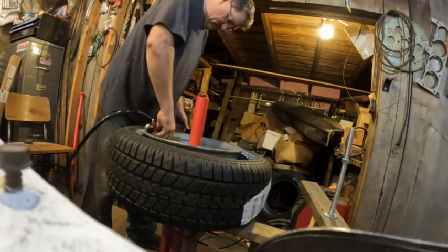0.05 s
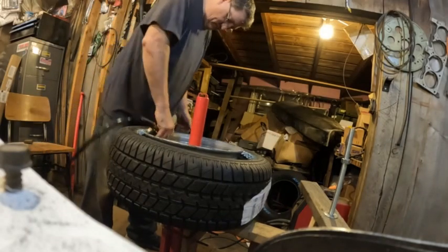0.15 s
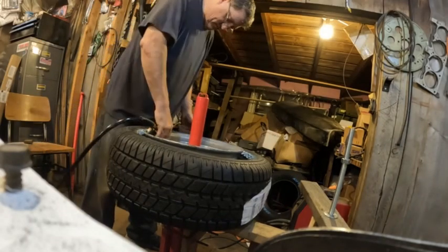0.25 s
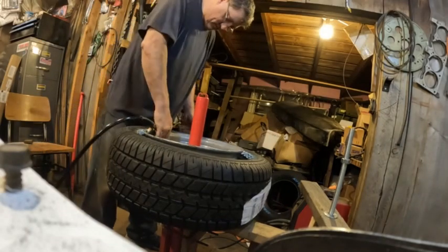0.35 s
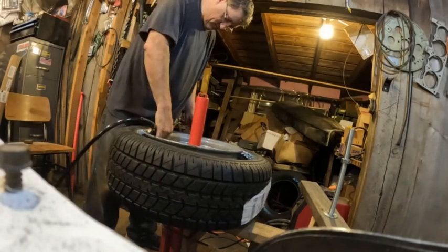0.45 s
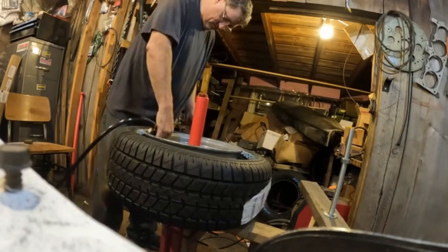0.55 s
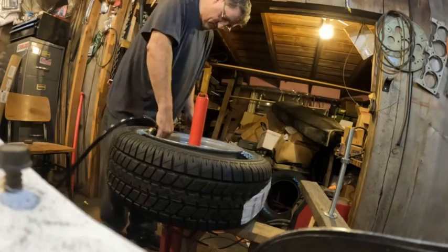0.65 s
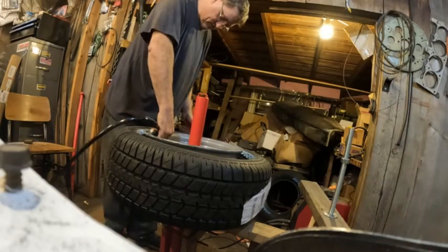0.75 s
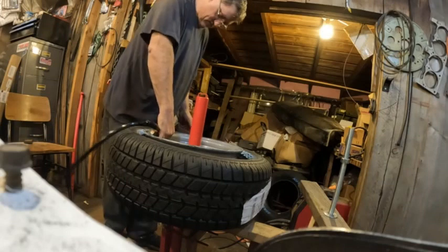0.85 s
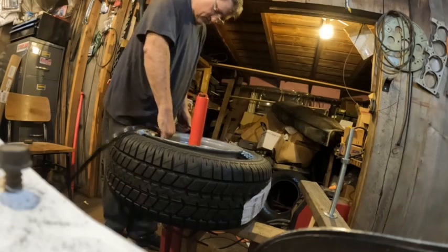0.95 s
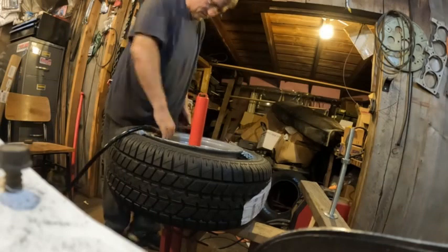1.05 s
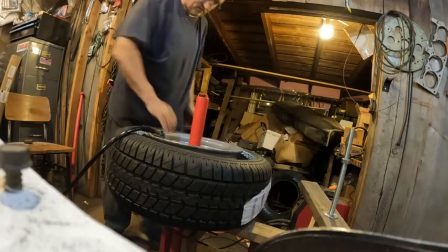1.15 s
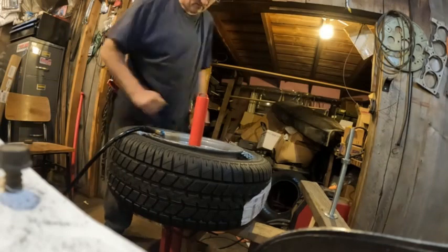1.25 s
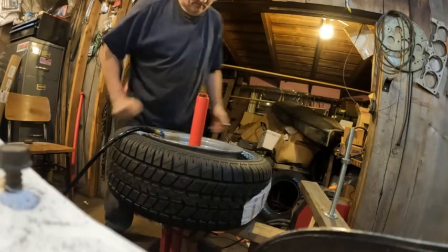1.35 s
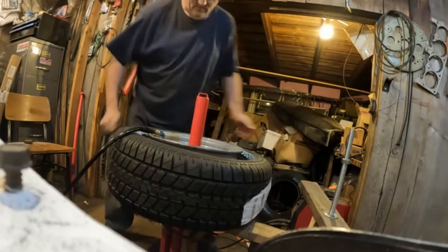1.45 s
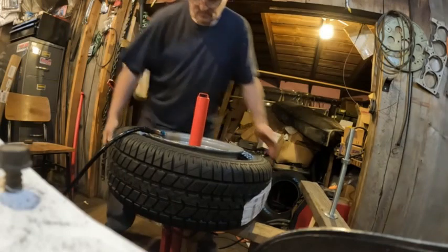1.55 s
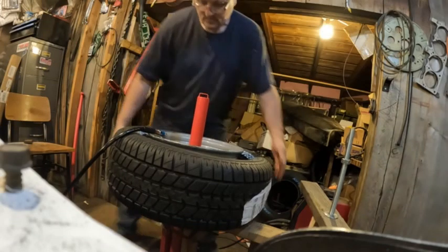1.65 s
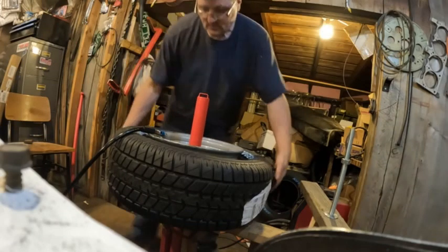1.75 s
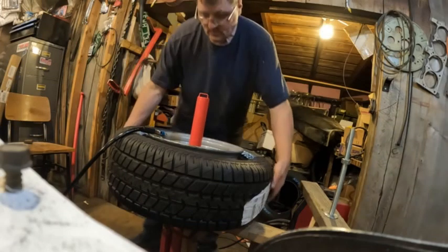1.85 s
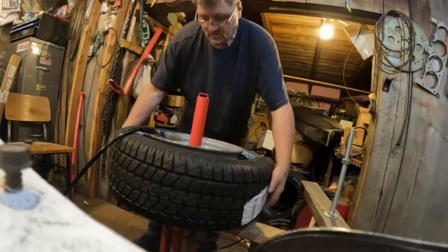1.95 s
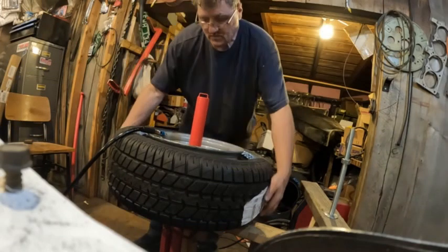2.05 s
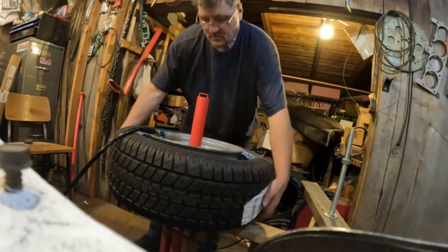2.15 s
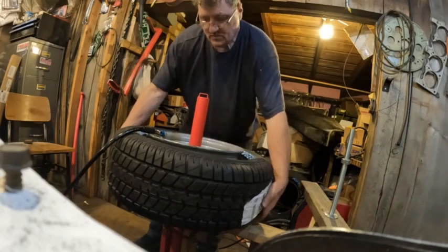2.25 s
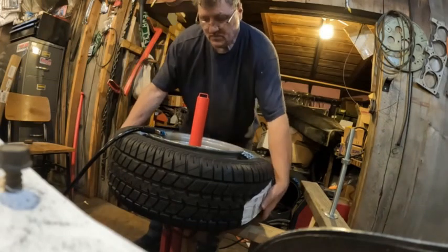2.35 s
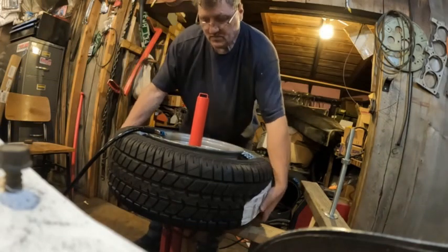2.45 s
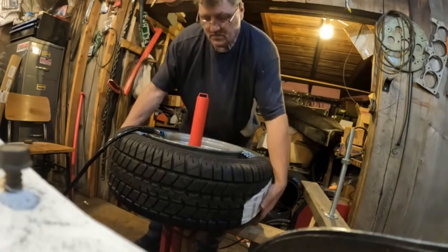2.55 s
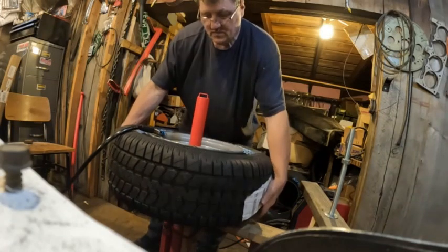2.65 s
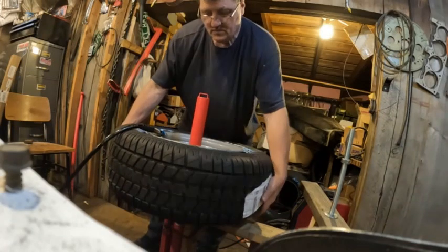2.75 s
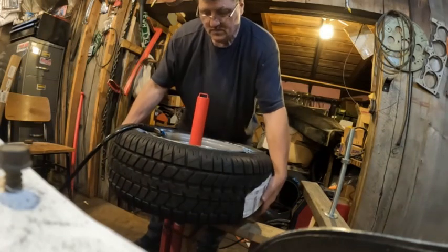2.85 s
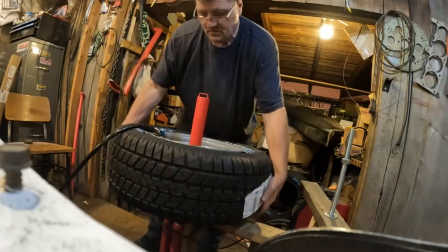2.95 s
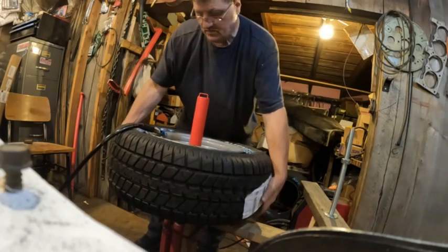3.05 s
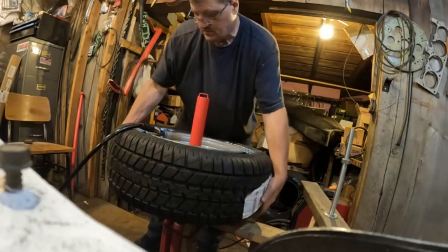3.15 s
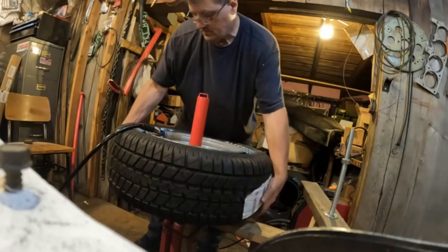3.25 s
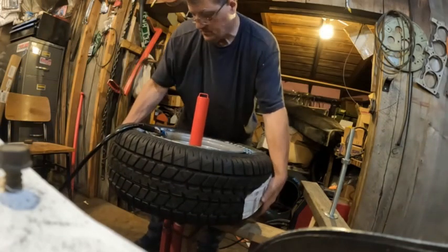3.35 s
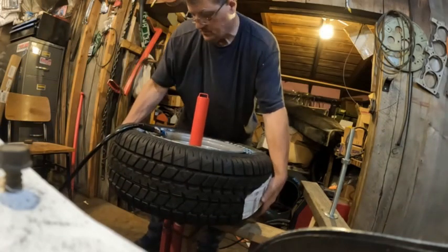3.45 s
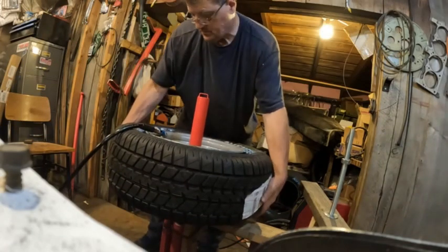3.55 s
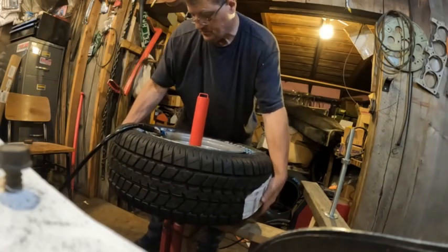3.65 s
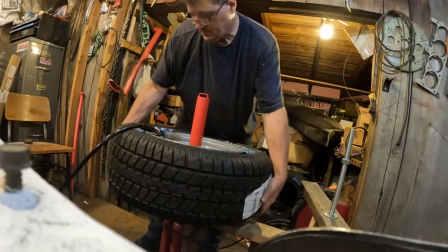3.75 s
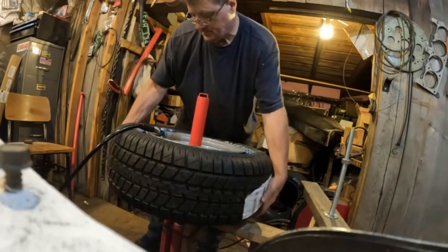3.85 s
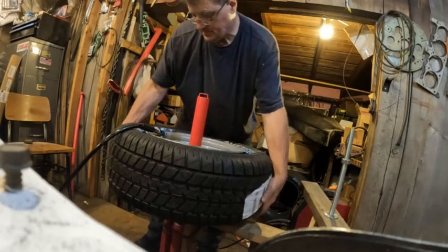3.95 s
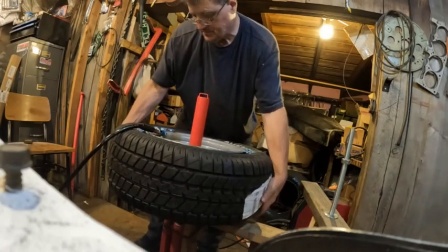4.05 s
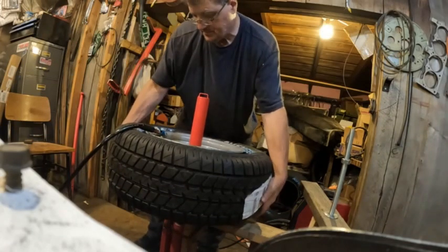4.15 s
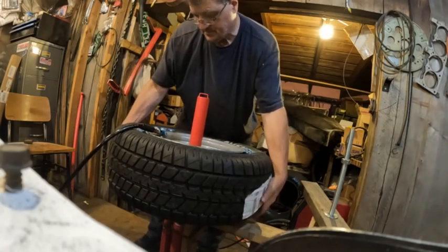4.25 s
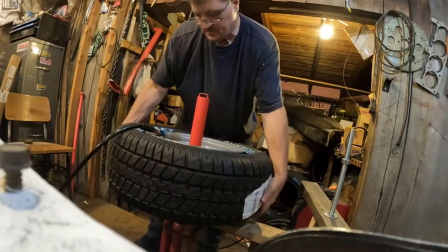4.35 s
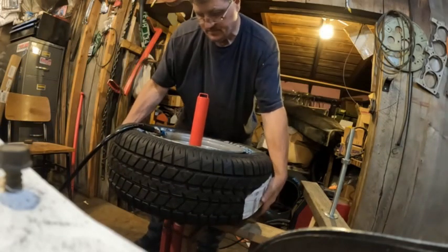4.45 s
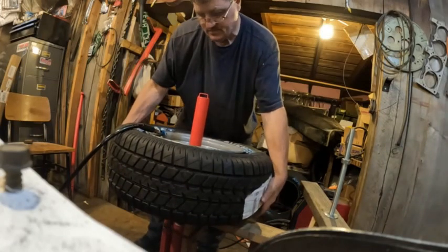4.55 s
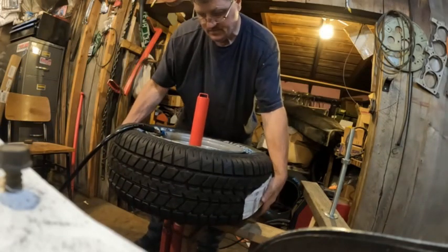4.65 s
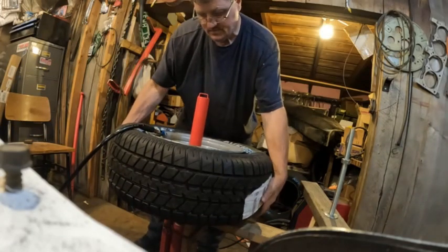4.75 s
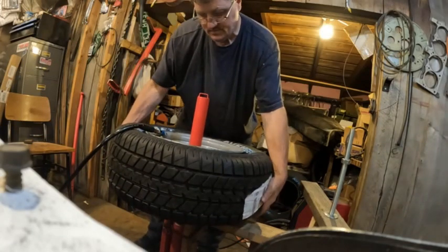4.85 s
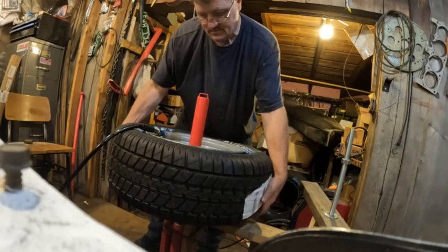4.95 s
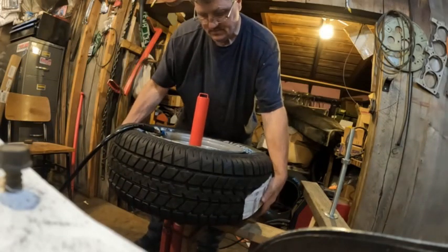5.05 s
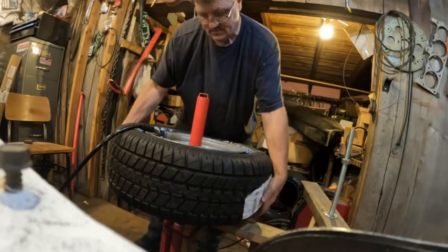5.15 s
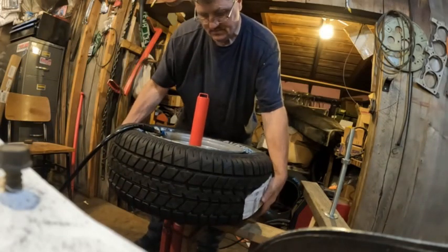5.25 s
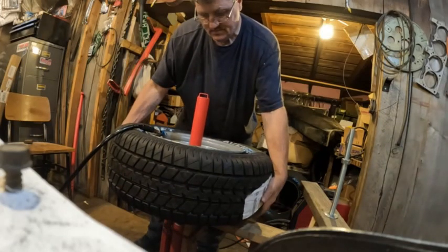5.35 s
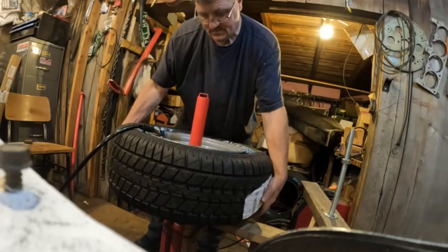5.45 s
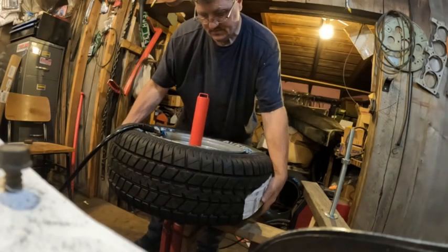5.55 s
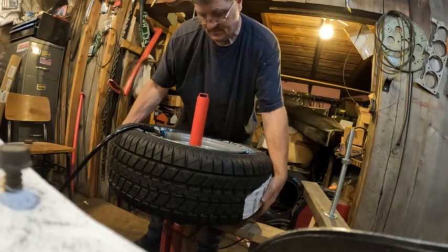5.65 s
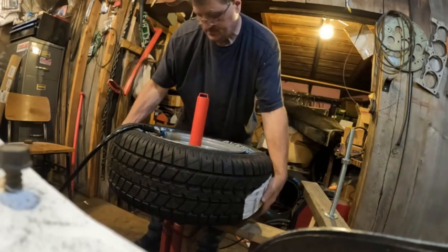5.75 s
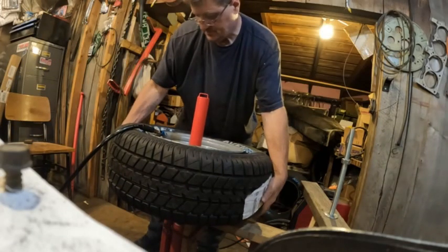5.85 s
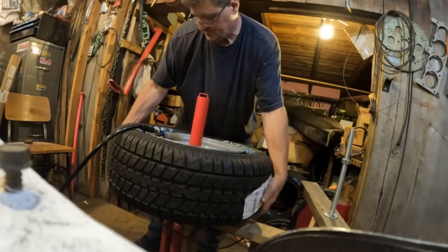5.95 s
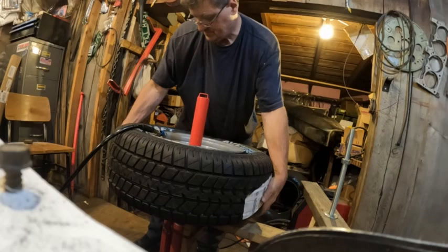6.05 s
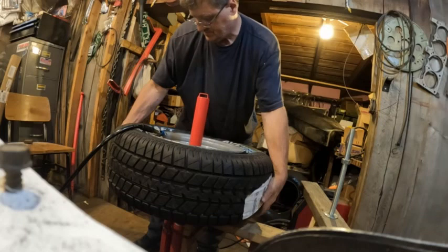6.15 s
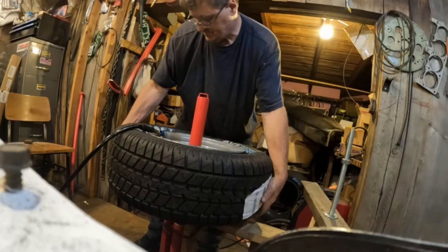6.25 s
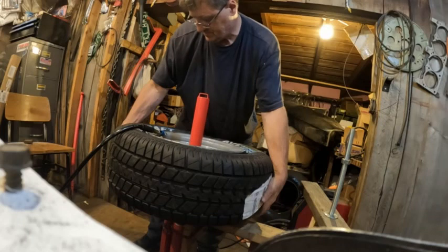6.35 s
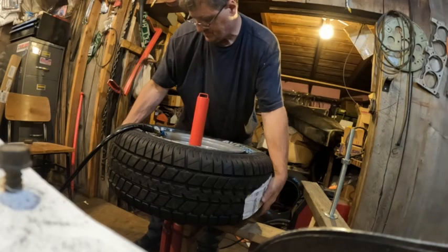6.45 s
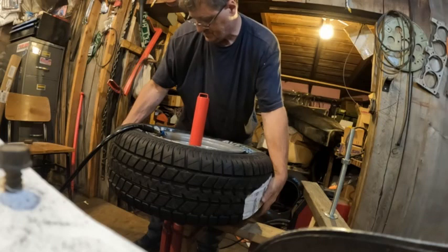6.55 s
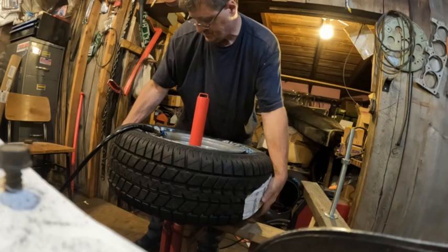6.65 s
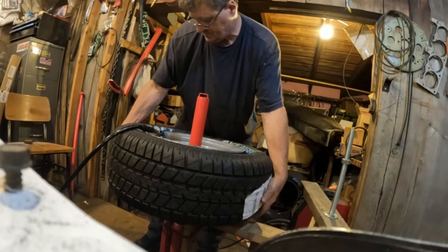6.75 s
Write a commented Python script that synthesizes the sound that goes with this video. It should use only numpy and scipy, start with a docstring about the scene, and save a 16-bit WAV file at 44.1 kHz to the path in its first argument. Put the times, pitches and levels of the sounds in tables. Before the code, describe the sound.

A loud, bright rush of escaping air fills the first three seconds, broken by a cluster of dull rubber thuds as the tyre is gripped and lifted. It cuts off quickly with a double low pop; a narrow high hiss rises and fades. The remaining air sings and hisses inside the closed tyre, swelling slightly after three and a half seconds, with tiny rubber knocks and rustles. Close microphones in a small garage.

```python
"""Inflating a tyre in a garage

A tyre is inflated on its wheel in a small wooden garage: air (filtered noise) roars out past the loose bead,
the edge of the tyre. The tyre is pulled up and the bead flops shut with a dull pop (fading sine thuds and noise).
A thin climbing hiss (narrow noise, shifted up in pitch) is squeezed off, and the jet goes on inside,
where noise filtered by the tyre's resonances rings, while the rubber creeps, knocks and rustles."""
import sys
import numpy as np
from scipy import signal
from scipy.fft import rfft, irfft
from scipy.io import wavfile
from scipy.ndimage import uniform_filter1d, map_coordinates

SR = 44100
rng = np.random.default_rng(int(sys.argv[2]) if len(sys.argv) > 2 else 0)


def unload_audio(sound):
    """Save the sound as a 16-bit wav file, at the path given as the first command line argument."""
    columns = np.transpose(np.atleast_2d(sound))
    # keep every value between -1 and 1, then stretch to whole-number steps
    steps = np.round(np.clip(columns, -1, 1) * 32767)
    wavfile.write(sys.argv[1], SR, steps.astype(np.int16))


N = 299880
T = np.arange(N) / SR
HZ = np.maximum(np.fft.rfftfreq(N, 1 / SR), 1)  # every frequency of the spectrum, kept above zero
# the tyre is gripped and pulled up, its bead starts to close, then seats on the rim
LIFT_S, CLOSING_S, SEATED_S = 0.9, 2.786, 2.92


# turbulence of the escaping air: (frequency [Hz], relative level [dB])
LEAK_COLOUR = [(25, -32), (180, -26), (500, -26), (850, -25.5), (1300, -14), (2600, -7.5), (4500, -2),
               (6100, 0), (7600, -6.5), (8200, -9), (9200, -10.5), (10200, -7.5), (11300, -13),
               (13400, -17)]
# resonances of the open gap and rim well: (frequency [Hz], width [Hz], relative level [dB])
GAP_MODES = [(241,19,-13), (1333,25,-12), (1601,22,-10), (1776,19,-8), (1943,64,-6), (2132,46,-5),
             (2485,80,-5), (2700,28,-2.5), (2794,92,-3), (2996,80,-2.5), (3117,17,1), (3407,65,6.5),
             (3578,62,6.5), (3823,19,0), (4181,69,-3), (4770,22,1), (4889,19,1), (5444,55,2), (5666,101,4),
             (5936,27,2.5), (6041,28,1.5), (7210,60,-1), (7660,169,0), (10512,28,-4.5)]


def open_bead():
    """Air roars past the open bead, brightens as the gap narrows and is cut off as it closes."""
    droop_db_per_s, cut_db_per_s = 0.23, 113
    level_db = -18 - droop_db_per_s * T - cut_db_per_s * since(CLOSING_S)
    tilt = -0.13 + 0.5 * T  # dB per octave
    gain = resonant(LEAK_COLOUR, GAP_MODES)
    roar = jet(gain, level_db, tilt, side_db=-13, flutter_db=0.68, flutter_rate=20)
    lower = shape(roar, colour([(500, -28), (1000, -6), (2000, 2.5), (3300, -25)]))
    # the lower part is fuller while the gap is wide; a passing hand briefly thins it
    pass_s, pass_length_s, shift_s = 1.146, 0.052, 0.06
    before_pass = 1 / (1 + np.exp(np.minimum((T - pass_s) / shift_s, 20)))
    fullness = 0.21 * before_pass - 0.61 * bump(pass_s, pass_length_s)
    return roar + fullness * lower


# turbulence of the jet heard through the tyre wall: (frequency [Hz], relative level [dB])
FILL_COLOUR = [(110, -34.5), (170, -23.5), (400, -46), (750, -42), (1200, -18), (2100, -22), (2600, -6),
               (3400, -5.5), (5400, -4.5), (7600, -9.5), (8400, -17), (10400, -17.5), (11500, -21.5),
               (13400, -24)]
# air resonances of the closed tyre: (frequency [Hz], width [Hz], relative level [dB])
CAVITY_MODES = [(437,19,-21), (646,10,-18.5), (856,8.2,-13), (912,6.7,-5), (982,12,-8.5), (1066,8,-3),
                (1236,6.2,-2.5), (1287,6.7,6.5), (1357,4.6,4), (1475,4.5,6.5), (1627,19,-1), (1780,5,5),
                (1824,8.5,0), (1874,7.1,8), (1967,10,0), (2048,8,1), (2177,10.5,5), (2340,25,4.5),
                (2474,6.8,9.5), (2660,5.2,7.5), (2720,7,1), (2780,12,3.5), (2874,10,3.5), (2950,11,6.5),
                (3033,12,9), (3400,22,2), (3565,21,3.5), (3675,5.6,10.5), (3860,9,4)]
# high resonances of valve and rim: (frequency [Hz], width [Hz], relative level [dB])
RIM_MODES = [(4690,50,-0.5), (4850,24,4.5), (5155,37,5.5), (5385,25,3.5), (5820,23,6.5), (6310,28,5),
             (6812,20,-3), (7200,40,-2), (8027,17,-5), (8730,45,-5), (9600,42,-7), (10250,24,-8),
             (12077,18,-14)]


def filling():
    """The jet rings the closed tyre like a hollow drum, louder, duller and slightly lower as it swells."""
    swell_s, rise_s = 3.55, 0.29  # the rubber starts to stretch, and how fast the jet then comes up
    slack_db, taut_db, growth_db_per_s = -39, -34.5, 0.5
    age = since(swell_s)
    level_db = taut_db + (slack_db - taut_db) * np.exp(-age / rise_s) + growth_db_per_s * age
    tilt = 1.5 - 0.26 * age  # dB per octave
    gain = resonant(FILL_COLOUR, CAVITY_MODES + RIM_MODES)
    air = jet(gain, level_db, tilt, side_db=-10, flutter_db=0.6, flutter_rate=10)
    # playing the sound ever more slowly makes its pitch sink
    sag_share_per_s = 0.0014
    speed = 1 + sag_share_per_s * (age[-1] / 2 - age)
    position = np.cumsum(speed)
    return np.array([map_coordinates(ear, [position], order=5, mode="mirror") for ear in air])


# broad hiss around the slit's note: (frequency [Hz], relative level [dB])
SLIT_COLOUR = [(800, -41), (1900, -7.5), (3500, -14), (4800, -3), (5750, 4.5), (6700, -4), (7700, -0.5),
               (10000, -3), (11500, -8), (13400, -10.5)]


def closing_slit():
    """A narrow, unsteady hiss of three strands climbs and dies as the bead presses home."""
    attack_s, shut_s = 0.052, 3.87
    fade_db_per_s, shut_db_per_s = 21.5, 45  # the second fade adds to the first
    start_hz, top_hz, climb_s, waver_hz = 8150, 10150, 0.42, 80
    width_hz, spacing_hz, strand = 420, 620, 0.45  # strand: filter gain of the two outer strands
    age = since(CLOSING_S)
    level_db = -34 - fade_db_per_s * since(SEATED_S) - shut_db_per_s * since(shut_s)

    def peak(hz):
        return 1 / (1 + (2 * (HZ - hz) / width_hz) ** 2)

    band = shape(noise(side_db=-12), peak(0) + strand * peak(spacing_hz))
    # the slit's resonances rise as it narrows, and the soft rubber makes them waver
    centre_hz = top_hz + (start_hz - top_hz) * np.exp(-age / climb_s)
    phase = 2 * np.pi * np.cumsum(centre_hz + waver_hz * walk(25)) / SR
    note = unit(band * np.cos(phase))  # moves the band up to the centre, mirrored on both sides
    hiss = unit(shape(noise(side_db=-12), colour(SLIT_COLOUR)))
    swell = np.minimum(age / attack_s, 1)
    return (undb(-1) * note + undb(3.5) * hiss) * undb(level_db) * swell


# rubber knocking and slipping on the rim; each knock starts one attack time early:
# (time [s], push level [dB], pitch [Hz], slap relative to push [dB], time for the ring to fall 60 dB [s])
KNOCKS = [(0.06, -40, 121, -4, 0.12), (1.249, -36.5, 241, -10, 0.2), (1.621, -29.5, 159, -12, 0.1),
          (1.654, -27, 120, -21, 0.09), (1.689, -33, 45, -13, 0.2), (1.879, -33.5, 171, -3, 0.077),
          (1.943, -37.5, 100, -2, 0.1), (2.139, -36, 239, -6, 0.15), (2.835, -35.5, 49.7, -7, 0.16),
          (2.888, -33, 45.3, -1, 0.18), (2.903, -31.5, 122, -6.5, 0.18), (3.834, -46, 266, -7, 0.13),
          (3.876, -37, 252.2, -19, 0.078), (3.887, -42, 136, -19, 0.089), (5.049, -55, 170, 0, 0.13),
          (5.119, -46, 267, -16, 0.11), (5.134, -50, 140, -13, 0.11), (5.619, -57, 183, 0, 0.12),
          (5.961, -53, 121, -9, 0.2), (6.045, -50, 236, -9, 0.071)]


def knocks():
    """Each slip of the bead thuds in the carcass (a fading sine) and slaps the rim with a dull rustle."""
    attack_s, slap_t60 = 0.0039, 0.22  # slap_t60: seconds to fall 60 dB
    thuds, slaps = np.zeros(N), np.zeros(N)
    for s, db, hz, slap_db, t60 in KNOCKS:
        t = since(s - attack_s)
        push = undb(db) * (1 - np.exp(-t / attack_s))
        thuds += push * undb(-60 * t / t60) * np.sin(2 * np.pi * hz * t)
        slaps += push * undb(slap_db - 60 * t / slap_t60)
    rubber = colour([(30, 4.0), (150, 4.5), (300, 1.5), (700, -0.5), (1500, 4.5), (3000, -10), (8000, -45)])
    return thuds + slaps * unit(shape(noise(side_db=-12), rubber))


# resonances of chuck and valve: (frequency [Hz], width [Hz], relative level [dB])
VALVE_MODES = [(1874, 6.5, 0), (3094, 12, -2), (3110, 18, -7), (3810, 7.5, 9.5)]


def valve():
    """Air through chuck and valve stem sings in narrow bands, loudest while the tyre takes its shape."""
    crest_db, crest_s, crest_length_s = 5.5, 4.12, 0.71
    level_db = -49.5 + crest_db * bump(crest_s, crest_length_s)
    gain = resonant([(100, -90), (14000, -90)], VALVE_MODES)
    return unit(shape(noise(side_db=-16), gain)) * undb(level_db)


# rustle of the tread under the hands: (frequency [Hz], relative level [dB])
RUB_COLOUR = [(70, -32), (160, 1.5), (240, 3), (330, -1), (440, 1.5), (600, -6.5), (900, -14),
              (3000, -23.5)]
# strokes of the hands over the tread: (middle [s], half length [s], level [dB])
STROKES = [(.2, 0.073, -51), (1.8, .32, -51.5), (3.864, 0.026, -58), (4.06, 0.063, -61.5),
           (4.42, 0.2, -66.5), (5.2, 0.22, -63.5), (6.02, .08, -68), (6.55, 0.31, -63.5)]


def hands():
    """Hands shift the tyre: the carcass booms, more when held up, and the tread rustles in fits and starts."""
    resting_db, lifted_db, settle_db_per_s = -58.5, -52.5, 202
    loose_db, firm_db = -59, -74.5  # steady rustle before and after the tyre is firm
    lift_length_s, firm_length_s = 0.55, 0.11
    lifted = np.minimum(since(LIFT_S) / lift_length_s, 1)
    firm = np.minimum(since(SEATED_S) / firm_length_s, 1)
    boom_db = resting_db + (lifted_db - resting_db) * lifted - settle_db_per_s * since(SEATED_S)
    contact = undb(loose_db + (firm_db - loose_db) * firm)
    # steady contact and strokes add up as powers
    stroke_power = sum((undb(db) * bump(s, length)) ** 2 for s, length, db in STROKES)
    rubbing = np.sqrt(contact ** 2 + stroke_power)
    boom_colour = colour([(20, 2), (50, -0.5), (130, 1.5), (250, -6.5), (600, -31)])
    boom = unit(shape(noise(side_db=-8), boom_colour))
    rub = unit(shape(noise(side_db=-10.5), colour(RUB_COLOUR)))
    rough_boom = boom * undb(boom_db + 3 * walk(29.84))
    rough_rub = rub * rubbing * undb(2.0 * walk(45))
    return rough_boom + rough_rub


def squeak():
    """The bead creeps on the rim with one faint, short squeak: a sine of slightly unsteady pitch."""
    middle_s, half_length_s, hz = 3.135, 0.023, 590
    phase = 2 * np.pi * np.cumsum(hz * (1 + 0.02 * walk(120))) / SR
    return undb(-60) * np.exp(-((T - middle_s) / half_length_s) ** 4) * np.sin(phase)


# low rumble of the garage: (frequency [Hz], relative level [dB])
RUMBLE = [(20, -2), (45, 3), (90, -22), (200, -9), (600, -40), (2000, -47)]


def rumble():
    """The garage's faint, steady background: noise that is strongest in the deep bass."""
    return undb(-71.5) * unit(shape(noise(side_db=-4), colour(RUMBLE)))


def jet(gain, level_db, tilt, side_db, flutter_db, flutter_rate):
    """Turbulent noise in octave bands: the flow sets level and tilt, and eddies make each band flutter."""
    spectrum = rfft(unit(shape(noise(side_db), gain)))
    octave = np.clip(np.log2(HZ / 4500), -3, 2)  # octaves above 4500 Hz
    out = 0
    for k in range(-3, 3):
        band = irfft(spectrum * np.maximum(1 - abs(octave - k), 0), N)
        lean = k if k >= -2 else 0  # the bass does not follow the tilt
        out = out + band * undb(tilt * lean + flutter_db * walk(flutter_rate))
    return out * undb(level_db)


def resonant(points, modes, skirt=14):
    """Gain of a broad spectrum with resonances standing out; each fades out some widths from its centre."""
    power = colour(points) ** 2
    for hz, width, db in modes:
        off = (2 * (HZ - hz) / width) ** 2
        power = power + undb(db) ** 2 / (1 + off) / (1 + off / (2 * skirt) ** 2)
    return np.sqrt(power)


def colour(points):
    """Gain at every frequency, drawn through (Hz, dB) points."""
    hz, db = np.transpose(points)
    return undb(np.interp(np.log(HZ), np.log(hz), db))


def shape(x, gain):
    """Filter a sound by a gain per frequency."""
    return irfft(rfft(x) * gain, N)


def noise(side_db):
    """Stereo noise: a common part and a part of opposite sign in the two ears."""
    mid, side = rng.standard_normal((2, N))
    return unit(mid + undb(side_db) * side * np.array([[1], [-1]]))


def walk(rate):
    """A random wandering curve: values held 1 / rate s, then smoothed twice; spread near 1."""
    k = max(int(SR / rate), 2)
    steps = np.repeat(rng.standard_normal(N // k + 1), k)
    smooth = uniform_filter1d(uniform_filter1d(steps, k), k)
    return unit(smooth[:N])


def since(s):
    """Seconds gone by since a moment; zero before it."""
    return np.maximum(T - s, 0)


def bump(s, length):
    """A smooth rise and fall around a moment, 1 at its top."""
    return np.exp(-((T - s) / length) ** 2)


def undb(db):
    """Decibels to gain."""
    return 10 ** (np.asarray(db) / 20)


def unit(x):
    """Scale to rms 1."""
    return x / np.sqrt(np.mean(x ** 2))


def garage(x, wet_db, t60):
    """Dense short reflections from the cluttered walls, different for each ear, falling 60 dB in t60 s."""
    t = T[:SR // 2]
    echoes = rng.standard_normal((2, len(t))) * undb(-60 * t / t60) * (t > 0.003)
    echoes /= np.sqrt(np.sum(echoes ** 2, axis=1, keepdims=True))
    wet = signal.fftconvolve(x, echoes, axes=1)[:, :N]
    return (x + undb(wet_db) * wet) / np.hypot(1, undb(wet_db))


def scene():
    """Air and rubber over the rumble; the open jet sprays the walls more than the closed tyre does."""
    outside = garage(open_bead() + closing_slit(), wet_db=-3, t60=0.18)
    inside = garage(filling() + valve(), wet_db=-8.0, t60=0.24)
    rubber = garage(knocks() + hands() + squeak(), wet_db=-11.5, t60=0.28)
    return outside + inside + rubber + rumble()


# the two microphone ports: (frequency [Hz], left minus right [dB], phase by which left lags [rad],
# gain of the difference between the channels [dB])
PORTS = [(60, 0.5, 0.077, -0.5), (300, -1.5, 0.52, -2.5), (600, -1, 0.67, 2), (1520, 1, 0.15, -2.5),
         (3270, 1.6, 1.15, -6.5), (4840, 1.5, 0.77, 3), (5400, -1, 0.27, -4.5), (6740, 2.5, 0.34, 0),
         (7600, 4, 0, 0), (8560, 8, 0.98, 8), (9960, 2.5, 0.51, -5), (11600, 1, 0.29, 2),
         (12900, 5, -.4, -2), (13500, 10.5, 0, 11)]


def record(dry):
    """Two close ports differ in level and phase at each frequency; the top is cut."""
    hz, *columns = np.transpose(PORTS)
    balance_db, lag, side_db = (np.interp(np.log(HZ), np.log(hz), c) for c in columns)
    mid = rfft(dry[0] + dry[1]) / 2
    side = rfft(dry[0] - dry[1]) / 2 * undb(side_db)
    left = (mid + side) * undb(balance_db / 2) * np.exp(-1j * lag)
    right = (mid - side) * undb(-balance_db / 2)
    # the ports share the power between them
    power = (undb(balance_db) + undb(-balance_db)) / 2 * (1 + undb(side_db - 9) ** 2)
    low_pass = 1 / np.sqrt(1 + (HZ / 13650) ** 300)  # a very steep cut at 13650 Hz
    return irfft(np.array([left, right]) * low_pass / np.sqrt(power), N)


dry = scene()
out = record(dry)
unload_audio(out)
```